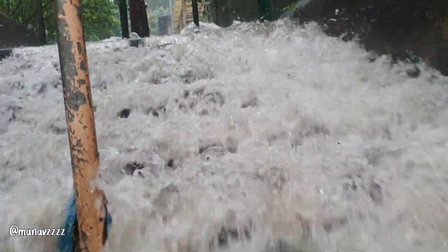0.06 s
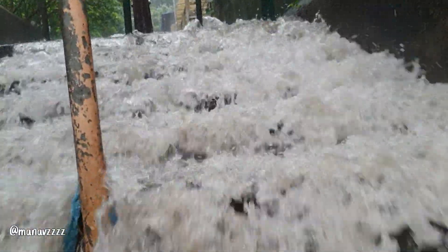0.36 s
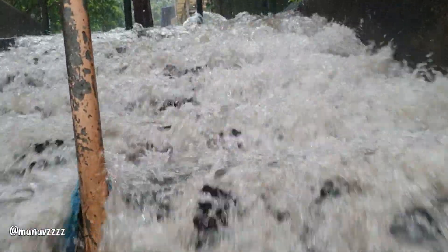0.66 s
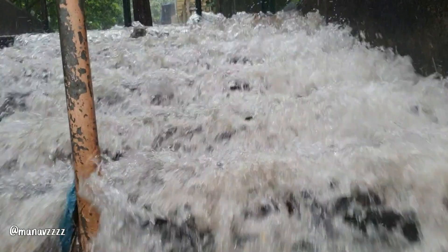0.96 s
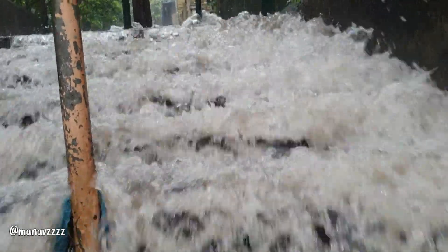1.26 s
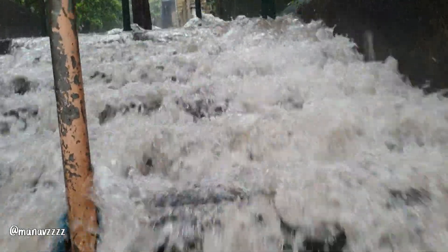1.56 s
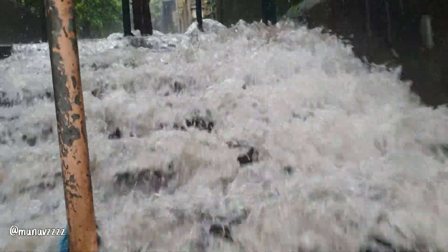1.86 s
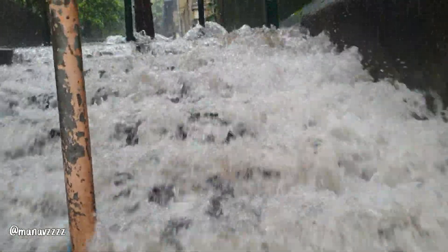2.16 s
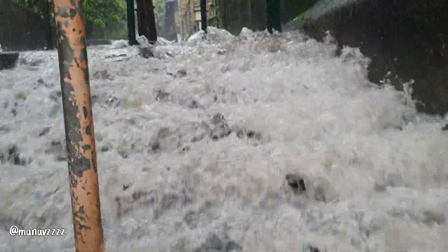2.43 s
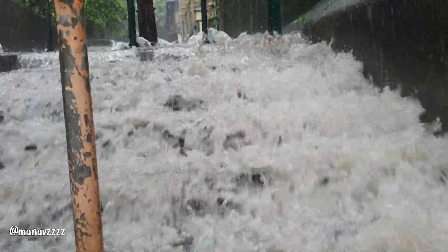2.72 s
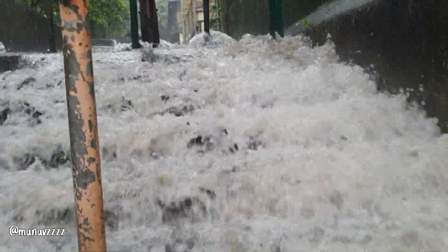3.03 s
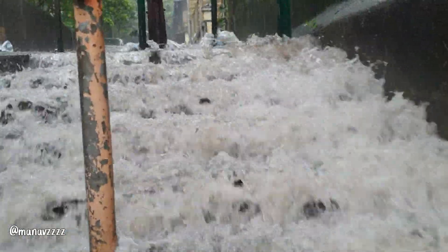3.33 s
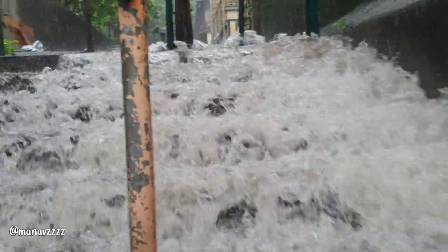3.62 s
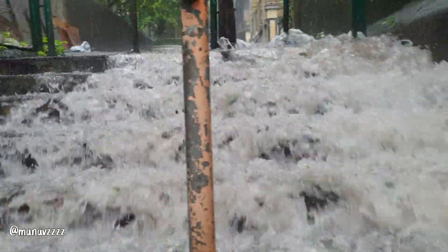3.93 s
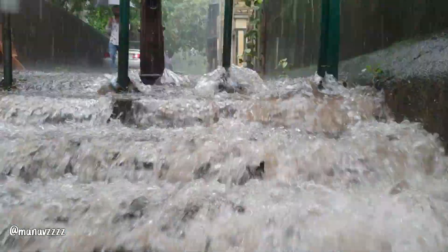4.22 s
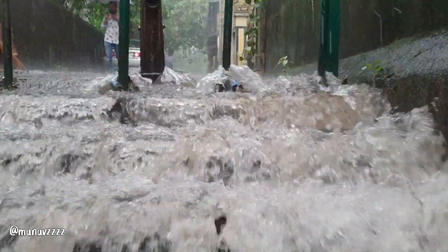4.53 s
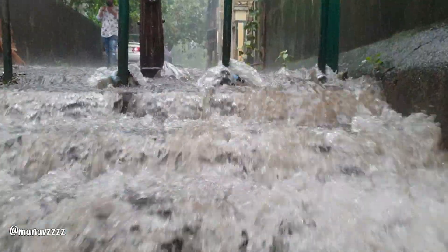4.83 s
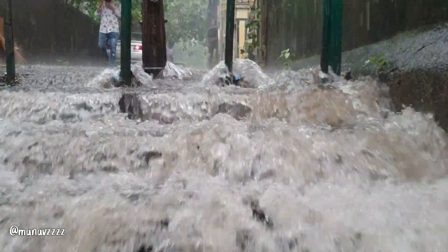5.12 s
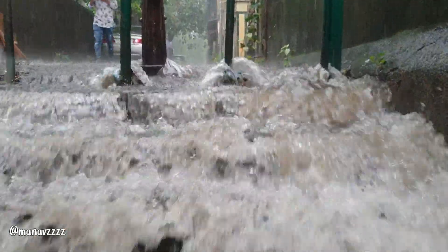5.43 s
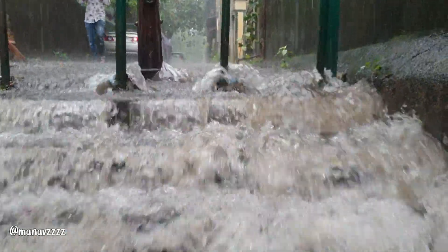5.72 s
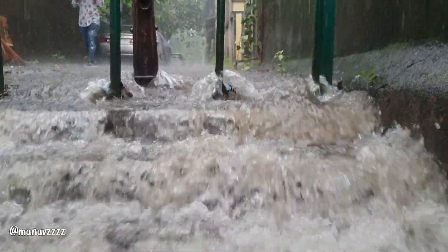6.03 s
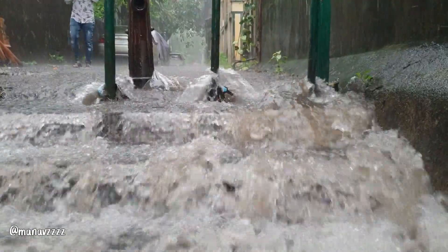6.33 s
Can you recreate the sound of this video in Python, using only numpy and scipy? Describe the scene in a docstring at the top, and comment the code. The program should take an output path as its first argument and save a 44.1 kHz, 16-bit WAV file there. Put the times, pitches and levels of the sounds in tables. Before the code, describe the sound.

Storm water rushes steadily down outdoor steps, foaming, splashing and gurgling, with one brief cut to silence.

```python
"""Storm runoff down outdoor steps

Water tumbles down a flight of steps, close to two microphones. Foam rushes, swarms of bubbles ring,
spray ticks, heavy sheets slosh, and pockets of trapped air gurgle and glug under the falling water.
A little after four seconds the sound is faded out to silence and straight back in."""
import sys
import numpy as np
from scipy import signal
from scipy.fft import rfft, irfft
from scipy.io import wavfile

SR = 44100
rng = np.random.default_rng(int(sys.argv[2]) if len(sys.argv) > 2 else 0)


def persist_wave(psi):
    """Save psi, clipped to +-1, as 16-bit WAV."""
    counts = np.round(np.clip(psi, -1, 1) * 32767).astype(np.int16)
    wavfile.write(sys.argv[1], SR, np.atleast_2d(counts).T)


N = 281215

# Stereo image of the rush; only long waves reach both sides alike (frequency [Hz], likeness [-1..1])
STEREO_LIKENESS = [(40, 0.96), (210, 0.99), (520, 0.66), (660, 0.49), (880, 0.0037), (1080, 0.41),
                   (1380, -0.44), (2250, 0.26), (2900, -0.072), (4000, 0.0076)]
# Tone of the cascade (frequency [Hz], left gain [dB], right gain [dB])
CASCADE_EQ = [(22, -20.5, -27.5), (54, -6.5, -5.5), (110, -6, -5), (296, -3, -2.5), (800, -0.4, 1),
              (1110, -0.4, -0.9), (2220, -1.7, -5.5), (4010, -9, -9.5), (4940, -9, -10.0), (7220, -7, -8.5),
              (8460, -14, -17), (11100, -13.5, -12.5), (15300, -15.5, -16.5)]
# Resonant air spaces between the steps and the falling sheets (centre [Hz], width [Hz], boost [dB])
AIR_SPACES = [(201, 49, 4), (686, 100, 0.3)]
# Strength of the cascade: builds after a second, holds, swells at the end (time [s], level [dB])
FLOW_LEVEL = [(0, -28.5), (1.0, -27.5), (1.35, -25.6), (3.07, -25), (3.16, -26), (3.26, -24.9), (4.08, -25),
              (4.17, -23.2), (4.5, -24.5), (6.0, -24.5), (6.37, -22.5)]
# Heavy water, thinning towards the top steps; trims on top of the flow
# (time [s], pounding on the treads [dB], churning [dB])
WATER_WEIGHT = [(0, -8.5, -2), (1.75, -7.5, -2.5), (2.45, -10, -2.5), (2.95, -9, -2.5), (3.6, -11, -3.5),
                (6.37, -11, -2.9)]
# Heavier sheets that slap down on a step (time [s], swell [dB])
SLOSH_SWELLS = [(0.25, 2.2), (1.46, 1.5), (3.03, 1.5), (4.8, 1.0)]
# Spells in which an air space keeps gurgling (start [s], end [s], pitch [Hz], relative level [dB])
GURGLE_SPELLS = [(1.4, 3.4, 200, -34), (2.0, 4.2, 699, -30.5), (4.6, 5.6, 691.4, -30.5),
                 (4.899, 5.6, 1045, -29)]
# The largest pockets of trapped air (time [s], pitch [Hz], relative level [dB])
BIG_POCKETS = [(1.454, 218.5, -25), (1.803, 188, -23), (2.148, 674, -26), (2.801, 734, -24.5),
               (3.108, 184, -23.5), (3.332, 643, -22), (3.462, 684, -22.5), (3.884, 760, -22.5),
               (5.487, 650, -27), (6.293, 820, -24)]
# One quick fade out and back in (time [s], gain [0..1])
FADER_MOVE = [(4.18, 1), (4.2, .5), (4.245, .42), (4.268, .03), (4.28, 0), (4.441, 0), (4.465, .42),
              (4.487, 1)]

MIC_GAP_S = .0005  # time that sound takes from one microphone to the other
RIGHT_LEAD_RAD, LEAD_KNEE_HZ = .42, 420  # most water falls on the right, so that side leads in phase


def gain_of(db):
    """Decibels to amplitude."""
    return 10 ** (np.asarray(db) / 20)


def unit_rms(x):
    """Scales a signal to rms 1."""
    return x / np.sqrt(np.mean(x ** 2) + 1e-20)


def envelope(rows, column):
    """One column of a timed table, drawn out to every sample."""
    rows = np.array(rows)
    return np.interp(np.arange(N) / SR, rows[:, 0], rows[:, column])


def at_frequency(rows, hz, column):
    """One column of a spectrum table, on a log-frequency axis."""
    rows = np.array(rows)
    return np.interp(np.log(hz + 1), np.log(rows[:, 0]), rows[:, column])


def wander(shape, *spans):
    """Smooth random drift of rms 1, with a smoothing span for each axis."""
    x = rng.standard_normal(shape)
    for axis, span in enumerate(spans):
        blur = np.exp(-(np.pi * np.fft.rfftfreq(shape[axis]) * span) ** 2 / 2)
        x = irfft(rfft(x.swapaxes(axis, -1)) * blur, shape[axis]).swapaxes(axis, -1)
    return unit_rms(x)


def scatter(seconds, sounds, side, pan_db):
    """Places short sounds (rows) in time; side -1..1 pans each by arrival time and by level."""
    out = []
    for mic in (-1, 1):
        start = np.round((seconds + mic * side * MIC_GAP_S / 2) * SR).astype(int)
        at = np.maximum(start, 0)[:, None] + np.arange(sounds.shape[1])
        heard = sounds * gain_of(mic * -side * pan_db)[:, None]
        out.append(np.bincount(at.ravel(), heard.ravel(), N)[:N])
    return np.array(out)


def rush(patch_db, patch_s, patch_hz):
    """A wide bed of countless tiny splashes; clouds of bubbles swell in patches of time and pitch."""
    frames, hz = N // 256 + 5, np.fft.rfftfreq(1024, 1 / SR)
    noise = rng.standard_normal((4, frames, len(hz)))
    left, unrelated = noise[::2] + 1j * noise[1::2]
    likeness = np.clip(at_frequency(STEREO_LIKENESS, hz, column=1), -.99, .99)
    right = likeness * left + np.sqrt(1 - likeness ** 2) * unrelated
    right *= np.exp(1j * RIGHT_LEAD_RAD * np.tanh(hz / LEAD_KNEE_HZ))
    clouds = gain_of(patch_db * wander(left.shape, patch_s * SR / 256, patch_hz / hz[1]))
    spectra = np.array([left, right]) * clouds
    _, bed = signal.istft(spectra.swapaxes(1, 2), nperseg=1024, noverlap=768)
    return unit_rms(bed[:, :N])


def bubbles(low_hz, high_hz, cycles, rise, spread_db, count):
    """Each bubble rings briefly and bends up in pitch as it nears the surface."""
    when, pitch, size, side, sustain = rng.random((count, 5)).T
    hz = low_hz * (high_hz / low_hz) ** pitch
    turns = hz[:, None] * np.arange(900) / SR
    age = turns / (cycles * (.5 + sustain))[:, None]  # in decay times
    bend = 1 + rise * np.minimum(age, 5) / 2
    rings = np.sin(2 * np.pi * turns * bend) * np.exp(-age) * np.linspace(1, 0, 900)
    strength = gain_of(spread_db * np.minimum(-np.log(1 - size), 4)) * hz ** 0.53
    return unit_rms(scatter(when * N / SR, rings * strength[:, None], 2 * side - 1, pan_db=4.0))


def spray(decay_s, spread_db, count):
    """Flung drops burst on foam and stone, each a tiny sharp tick."""
    when, size, side = rng.random((count, 3)).T
    ticks = rng.standard_normal((count, 96)) * np.exp(-np.arange(96) / SR / decay_s)
    ticks = signal.lfilter([1, -1], [1, -.6], ticks)  # small drops carry no bass
    strength = gain_of(spread_db * np.minimum(-np.log(1 - size), 5))  # many soft, a few loud
    return unit_rms(scatter(when * N / SR, ticks * strength[:, None], 2 * side - 1, pan_db=6.5))


def cascade(water, pounding_db, churn_db, splash_db):
    """Splits the water into low pounding, mid churn and bright splash, all riding the flow."""
    hz = np.fft.rfftfreq(N, 1 / SR)
    hollows_db = sum(db / (1 + (2 * (hz - centre) / width) ** 2) for centre, width, db in AIR_SPACES)
    eq_db = np.array([at_frequency(CASCADE_EQ, hz, column) for column in (1, 2)])
    low_cut = hz / np.hypot(hz, 20)
    spectrum = rfft(water) * gain_of(eq_db + hollows_db) * low_cut
    lows, lows_and_mids = (1 / (1 + (hz / edge_hz) ** 8) for edge_hz in (280, 1300))
    slosh_db = sloshing(half_length_s=.035)
    low_db = envelope(WATER_WEIGHT, column=1) + pounding_db + surging(depth_db=0.7, span_s=0.08)
    mid_db = envelope(WATER_WEIGHT, column=2) + churn_db + slosh_db
    high_db = splash_db + .6 * slosh_db + surging(depth_db=0.38, span_s=0.016)
    out = np.zeros((2, N))
    for band, level_db in [(lows, low_db), (lows_and_mids - lows, mid_db), (1 - lows_and_mids, high_db)]:
        layer = irfft(spectrum * band, N)
        out += layer / layer.mean(0).std() * gain_of(level_db)
    return out * gain_of(envelope(FLOW_LEVEL, column=1) + surging(depth_db=0.15, span_s=0.05))


def surging(depth_db, span_s):
    """Random swings of level, in dB, as the water comes in uneven sheets."""
    return depth_db * wander((N,), span_s * SR)


def sloshing(half_length_s):
    """Each heavy sheet landing on a step gives a short, smooth swell of level, in dB."""
    t = np.arange(N) / SR
    return sum(db * np.exp(-((t - s) / half_length_s) ** 2) for s, db in SLOSH_SWELLS)


def gurgles(per_s, pitch_spread):
    """Cues for small, irregular pockets pitched near their air space (time [s], pitch [Hz], level [dB])."""
    cues = []
    for start, end, hz, db in GURGLE_SPELLS:
        jitter, detune = rng.random((64, 2)).T
        times = start + (np.arange(64) + jitter) / per_s
        pitches = hz * (1 + pitch_spread * (2 * detune - 1))
        cues += [(at, pitch, db) for at, pitch in zip(times, pitches) if at < end]
    return cues


def glugs(pockets, swell_s, rise):
    """Each air pocket swells into a short hollow note, slightly rising."""
    onsets, hz, db = np.transpose(pockets)
    t = np.arange(SR // 6) / SR
    age = t / swell_s
    bend = 1 + rise * (age / 2 - 1)
    swell = age ** 2 * np.exp(2 * (1 - age))
    notes = np.sin(2 * np.pi * hz[:, None] * t * bend) * swell
    return scatter(onsets, notes * gain_of(db)[:, None], rng.uniform(-.4, 0.43, len(onsets)), pan_db=0.0)


def scene():
    """Rush, bubbles and spray blend into the cascade; gurgles and glugs poke through it."""
    water = rush(patch_db=0.94, patch_s=0.044, patch_hz=97)
    fizz = bubbles(low_hz=597.0, high_hz=4500, cycles=11.7, rise=0.014, spread_db=2.0, count=3000)
    water += gain_of(-17) * fizz
    water += gain_of(-7) * spray(decay_s=0.00032, spread_db=1.5, count=14000)
    stream = cascade(water, pounding_db=-1.1, churn_db=-0.8, splash_db=0.37)
    pockets = BIG_POCKETS + gurgles(per_s=14, pitch_spread=0.139)
    return stream + gain_of(-2.0) * glugs(pockets, swell_s=0.02, rise=0.022)


def record(dry):
    """The fader dips to silence once, and a steep high cut trims the very top."""
    faded = dry * envelope(FADER_MOVE, column=1)
    high_cut = signal.firwin(801, cutoff=15520, window=("kaiser", 9), fs=SR)
    return signal.oaconvolve(faded, high_cut[None], "same")


dry = scene()
out = record(dry)
persist_wave(out)
```